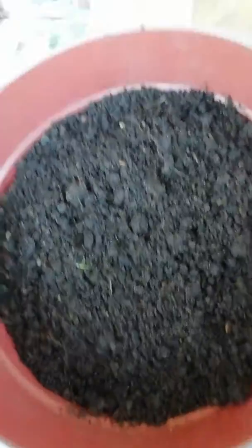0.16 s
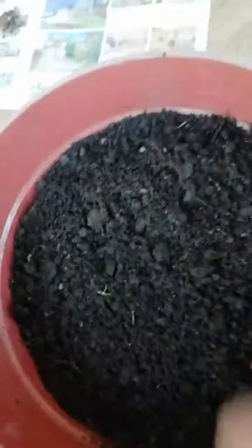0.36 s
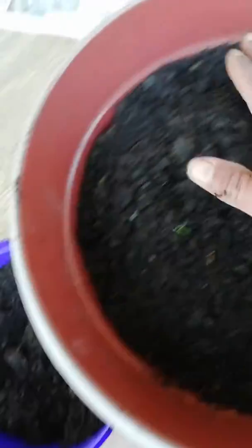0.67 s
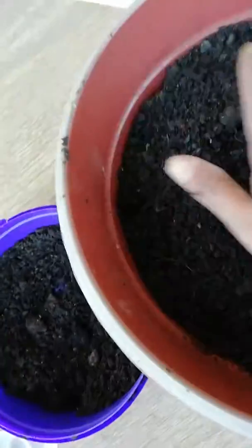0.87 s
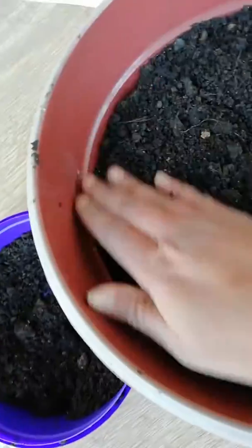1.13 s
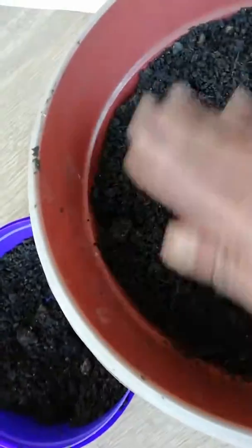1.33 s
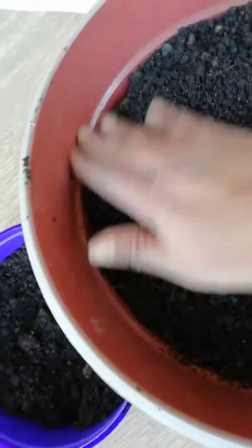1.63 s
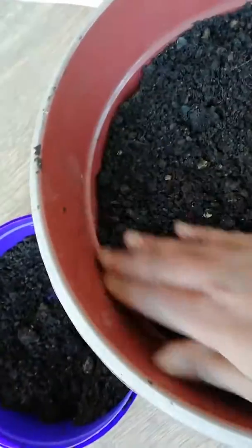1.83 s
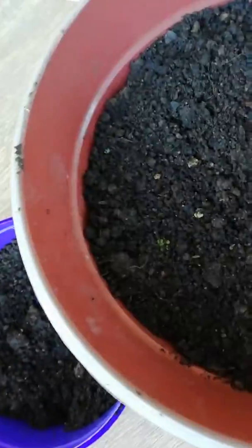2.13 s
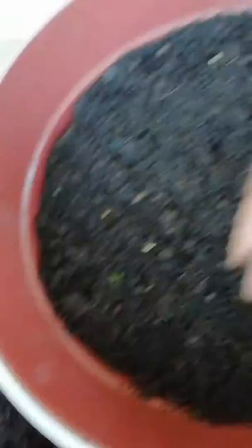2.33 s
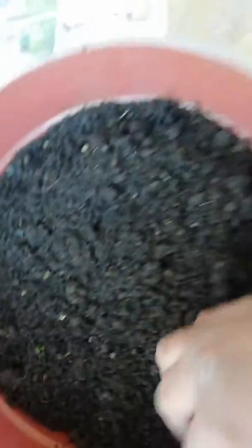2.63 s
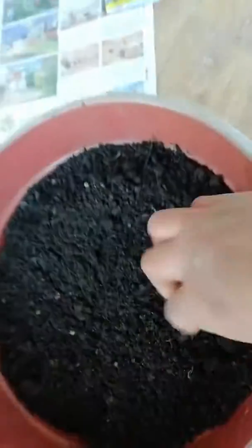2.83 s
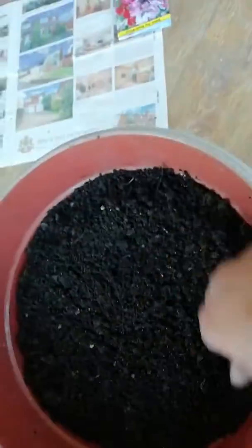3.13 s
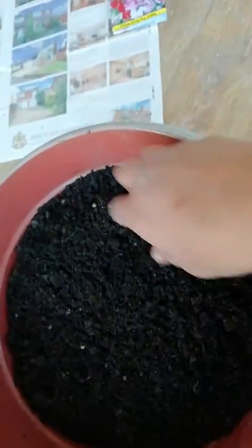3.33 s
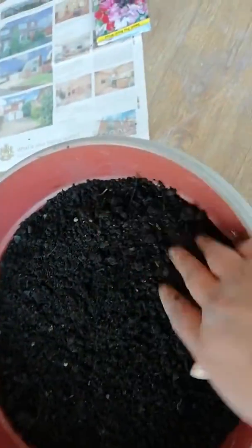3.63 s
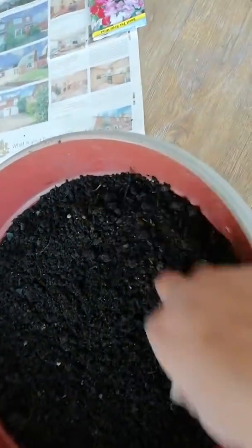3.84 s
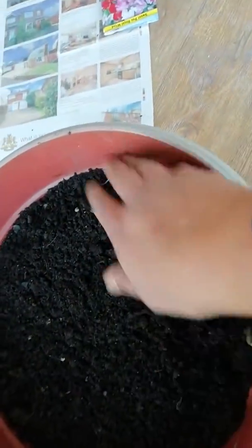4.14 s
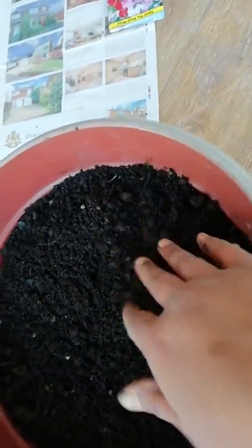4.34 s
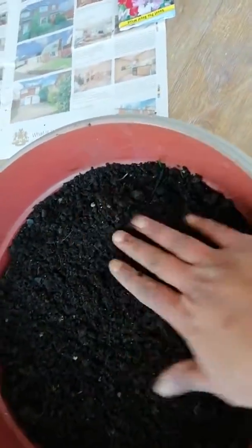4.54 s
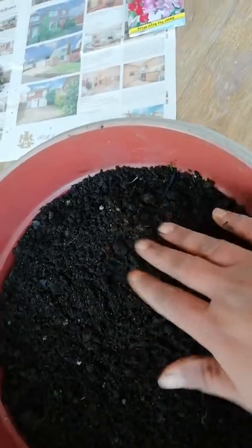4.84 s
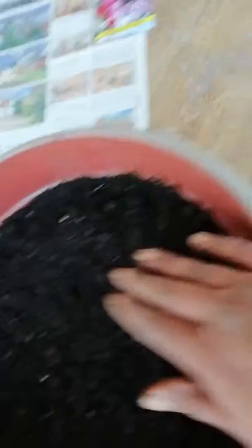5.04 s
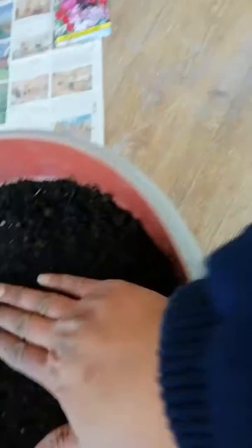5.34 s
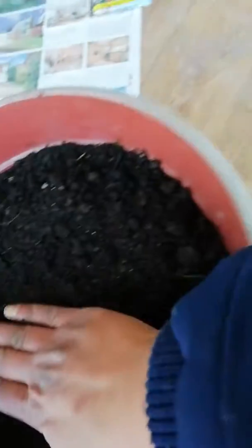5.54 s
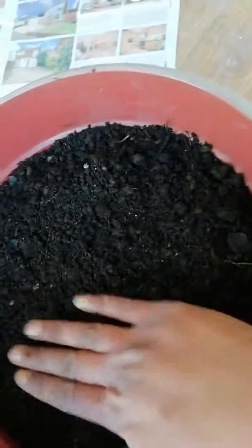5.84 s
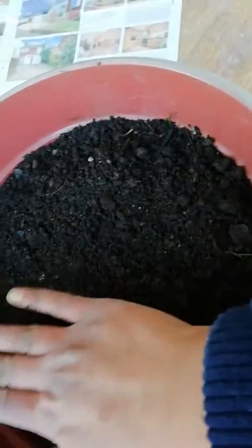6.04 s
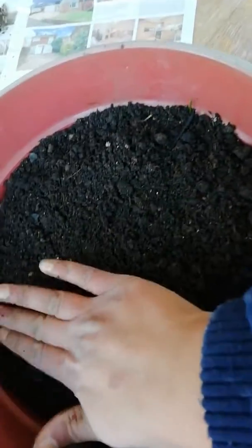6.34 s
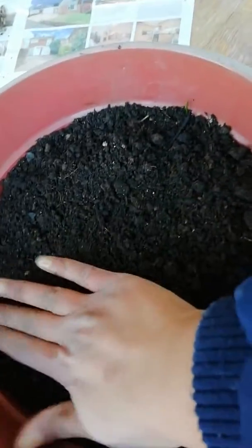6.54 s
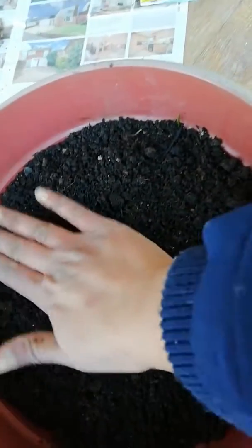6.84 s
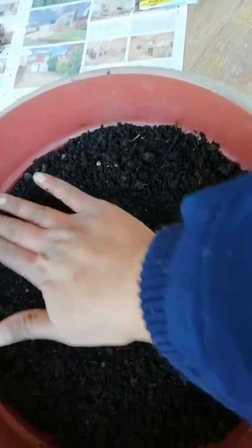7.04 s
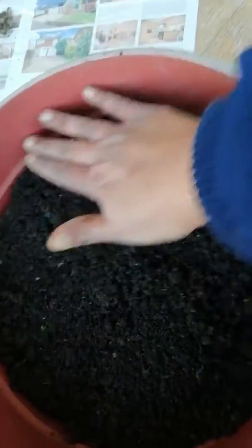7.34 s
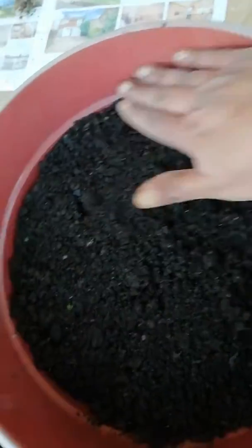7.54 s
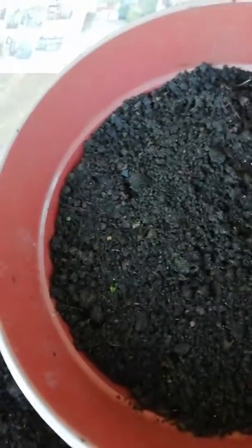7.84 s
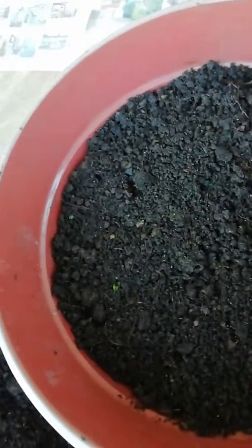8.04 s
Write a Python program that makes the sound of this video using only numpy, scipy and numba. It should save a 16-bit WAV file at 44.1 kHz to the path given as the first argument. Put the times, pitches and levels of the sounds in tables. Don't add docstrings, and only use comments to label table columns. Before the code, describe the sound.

Hands sweep and dig through loose crumbly soil in a plastic pot, with sharp knocks, gentle pats and a low engine hum outside.

```python
import sys
import numpy as np
from scipy import signal
from scipy.fft import rfft, irfft
from scipy.io import wavfile
from scipy.ndimage import uniform_filter1d
from numba import njit

SR = 44100
rng = np.random.default_rng(int(sys.argv[2]) if len(sys.argv) > 2 else 0)


def materialize(psi):
    bounded = np.clip(np.atleast_2d(psi).T, -1, 1)
    quanta = np.round(bounded * 32767).astype(np.int16)
    wavfile.write(sys.argv[1], SR, quanta)


def undo_db(level):
    steps = np.asarray(level, float) / 20
    return 10 ** steps


N = 361179
TIME = np.arange(N) / SR
ONE = np.ones(N)
SIDES = np.array([[1], [-1]])

# (time [s], resonance under the palm [Hz], left minus right [dB])
PALM = [(0.26, 1717, -14.5), (0.64, 1700, -12.5), (0.8, 2500, -13), (1.05, 1900, -10), (1.3, 2440, -9),
        (2.1, 2770, -6.5), (2.6, 2940, -13), (3.03, 1796, -10.5), (3.3, 2120, -11.5), (5.04, 1600, -12),
        (5.27, 2320, -11.5), (5.78, 1560, -10), (6.09, 2550, -6), (7.12, 2174, -14), (7.32, 1310, -7.5),
        (7.41, 2830, -5.5), (7.63, 3120, -7.5), (8.19, 1780, -14)]


def level(x, db):
    mono = np.mean(np.atleast_2d(x), axis=0)
    return x * undo_db(db) / np.sqrt(np.mean(mono ** 2))


def columns(table):
    s, *rest = np.transpose(table)
    return [np.interp(TIME, np.maximum.accumulate(s), c) for c in rest]


def during(table):
    is_open = 1. * (TIME >= table[0][0]) * (TIME <= table[-1][0])
    return uniform_filter1d(is_open, SR // 14, mode="nearest")


def walk(rate):
    k = int(SR / rate)
    held = rng.standard_normal(N // 40)[np.arange(N) // k]
    return 1.3 * uniform_filter1d(uniform_filter1d(held, k), k)


def colour(x, points):
    hz, db = np.transpose(points)
    grid_hz = np.maximum(np.fft.rfftfreq(4096, 1 / SR), 1)
    cepstrum = irfft(np.interp(np.log(grid_hz), np.log(hz), db) * np.log(10) / 20)
    cepstrum[1:2048] *= 2
    cepstrum[2049:] = 0
    return signal.fftconvolve(x, irfft(np.exp(rfft(cepstrum))))[:len(x)]


def band(x, lo_hz, hi_hz):
    return signal.sosfilt(signal.butter(3, [lo_hz, hi_hz], "band", fs=SR, output="sos"), x)


@njit
def svf(x, hz, width):
    y, b, l = np.empty(len(x)), 0., 0.
    for i in range(len(x)):
        g, k = np.tan(np.pi * hz[i] / SR), width[i] / hz[i]
        v = (b + g * (x[i] - l)) / (1 + g * (g + k))
        b, l, y[i] = 2 * v - b, l + 2 * g * v, k * v
    return y


def ports(x):
    # (frequency [Hz], gain [dB])
    left_port = [(450, -6.5), (1200, 4), (1700, -1), (2300, -3.5), (3300, 2.5), (4000, -5), (4800, -3.5),
                 (6100, -6), (7600, -20), (9200, -4), (10000, -2), (13000, 0), (15000, 7), (16200, -37)]
    right_port = [(450, -0.5), (1200, 7.5), (1700, 6), (2400, 4.5), (3300, 6.5), (4000, -1), (4900, 3.5),
                  (6300, 11), (7100, 9.5), (7900, 0), (9300, -3), (10100, -0.5), (15000, -0.5),
                  (16200, -30)]
    return np.array([colour(x[0], left_port), colour(x[1], right_port)])


def room(x):
    t60_s, tail_db = 0.55, -26
    t = np.arange(SR // 2) / SR
    tail = rng.standard_normal((2, len(t))) * undo_db(-60 * t / t60_s) * (t > .004)
    tail *= undo_db(tail_db) / np.sqrt(np.sum(tail ** 2, axis=1, keepdims=True))
    return signal.fftconvolve(x, tail, axes=1)[:, :N]


def wall(x):
    # (frequency [Hz], width [Hz], level [dB])
    pot_modes = [(1600, 50, -4), (2070, 81, -7.5), (2520, 45, 5), (2960, 48.6, -35)]
    return sum(undo_db(db) * np.array([svf(c, hz * ONE, w * ONE) for c in x]) for hz, w, db in pot_modes)


def echoes(x):
    # (delay [ms], level [dB])
    returns = [(.8, -11), (1.903, -15.5), (3.299, -9), (5.9, -8.5)]
    i, out = np.arange(N), x.copy()
    for ms, db in returns:
        late = ms * SR / 1000 * (1 + .06 * walk(2.5))
        out += undo_db(db) * np.array([np.interp(i - late * k, i, c) for k, c in zip((1, 1.04), x)])
    return out


def background():
    # (time [s], level [dB])
    street = [(0.0, -61), (0.34, -58.5), (1.46, -60.5), (2.28, -66), (2.96, -62.5), (4.1, -65),
              (5.38, -60.5), (6.38, -60), (6.8, -61), (8.19, -63.5)]
    # (time [s], level [dB])
    drone = [(0, -54), (1, -56.5), (2.5, -56), (5.4, -66), (6.7, -72.5), (8.19, -60)]
    # (frequency [Hz], density [dB per Hz])
    rumble_colour = [(12, -45.5), (20, 5.5), (49, -1), (60, 2.5), (81, -7.5), (130, -6), (252, -15.5),
                     (348, -29.5), (420, -21.5), (500, -26.5), (650, -63), (1100, -120)]
    # (frequency [Hz], density [dB per Hz])
    air_colour = [(300, -13), (600, -8), (1200, -8), (2500, -11), (4000, -16.5), (7000, -19), (15000, -20)]
    # (frequency [Hz], width [Hz])
    room_modes = [(121, 4.6), (249, 21)]
    rumble_db, air_db = -57, -68.5
    street_db, = columns(street)
    swing_db = street_db - street_db.mean()
    mode_db = columns(drone)[0], -69 + 1.7 * swing_db
    mid, side = (colour(rng.standard_normal(N), rumble_colour) for _ in range(2))
    side = signal.sosfilt(signal.butter(2, 420, "high", fs=SR, output="sos"), side)
    rumble = level(mid + undo_db(6.0) * SIDES * side, rumble_db) * undo_db(swing_db)
    modes = 0
    for (hz, width_hz), db in zip(room_modes, mode_db):
        drift_hz = hz * (1 + 0.017 * walk(1.497))
        modes = modes + level(svf(rng.standard_normal(N), drift_hz, width_hz * ONE), db - 0.5)
    air = ports([colour(band(rng.standard_normal(N), 230, 17250), air_colour) for _ in range(2)])
    return rumble + modes + level(air, air_db)


def engine():
    # (time [s], firing rate [Hz], level [dB], load as lift of the upper orders [dB])
    phases = [
        [(0.0, 38.8, -51.5, -9.5), (0.28, 41.23, -47.5, -25), (0.58, 49.07, -37.5, -14.5),
         (1.01, 50.3, -55, -7), (1.26, 51.8, -45.5, -15.5), (1.8, 49.1, -46.5, -10), (2.1, 50.6, -57.5, -12)],
        [(1.75, 40.13, -53, -9.5), (1.99, 39.02, -50, -24.5), (2.16, 30.2, -53, -16), (2.5, 29.2, -50.5, -9),
         (3.85, 26.27, -48.5, -17), (4.1, 29.03, -51.5, -21), (4.3, 26.46, -49, -13), (4.72, 25.9, -58, -29)],
        [(4.65, 31.6, -57.5, -4), (4.95, 34.08, -79.5, 13), (5.3, 35.26, -62.5, 4.5), (5.67, 35.93, -52.5, -7),
         (6.2, 37.6, -66, 10), (6.6, 38.46, -71.5, 15), (6.8, 32.4, -60, -7.5), (7.38, 30.7, -52, -4.5),
         (8.19, 27.8, -61, 2.5)],
    ]
    # (order 3 [dB], order 6 [dB])
    upper_orders = [(-9, -38), (-10.5, -1), (-22, -11.5)]
    # (frequency [Hz], width [Hz], lift [dB])
    house = [(118.4, 8.1, 19), (228.4, 4.6, 19.5)]
    orders = (1, 2, 3, 6)
    out = 0
    for phase, (third_db, sixth_db) in zip(phases, upper_orders):
        hz, db, load_db = columns(phase)
        turn = 2 * np.pi * np.cumsum(hz * (1 + 0.0058 * walk(5.5))) / SR
        for k, lift_db in zip(orders, (0, load_db, load_db + third_db, load_db + sixth_db)):
            house_db = sum(g * np.exp(-((k * hz - f) / w) ** 2) for f, w, g in house)
            strength = undo_db(db + lift_db + house_db + 3.5 + 2.35 * walk(9.2))
            out = out + during(phase) * strength * np.sin(k * turn + k)
    return out


def thumps():
    # (time [s], level [dB], rise per 60 dB [s], t60 [s])
    rocks = [
        (.33, -57, 0.65, 0.43),
        (1.621, -54, 0.027, .08),
        (3.006, -52, 0.016, 0.65),
        (7.25, -62, 0.21, 0.29),
    ]
    noise = rng.standard_normal((2, N))
    shape = 0
    for s, db, rise, t60 in rocks:
        shape = shape + undo_db(db - 60 * abs(TIME - s) / np.where(TIME < s, rise, t60))
    return level(band(noise[0] + 0.3 * noise, 135, 630), 0) * shape


def squeak():
    # (time [s], pitch [Hz], level [dB])
    slide = [(3.38, 3820, -76), (3.43, 3560, -76), (3.48, 3527, -76), (3.54, 3310, -64), (3.8, 3070, -84)]
    hz, db = columns(slide)
    tone = level(svf(rng.standard_normal(N), hz, 39.6 * ONE), 0)
    return tone * during(slide) * undo_db(db - 5.9 * SIDES)


def knocks():
    # (time [s], peak [dB], ring [Hz], sharpness [dB])
    pot_knocks = [(0.0293, -45.5, 1490, 1.5), (1.134, -45, 1530, -26), (1.1703, -36, 2520, -25),
                  (1.6194, -40, 2580, -21), (1.9463, -37, 2740, -6), (2.1617, -42.5, 1220, -18),
                  (2.1852, -38.5, 2180, -5), (2.537, -36, 1600, -15), (2.5552, -39, 3300, -4),
                  (2.766, -46.5, 1600, -12), (2.822, -47, 3190, -13), (2.8945, -51.5, 3930, -10),
                  (3.0042, -21.5, 2240, -21.5), (3.038, -38, 2120, -6.5), (3.1284, -26, 2170, -10),
                  (3.1862, -12, 3150, -9.5), (3.1958, -18.5, 2920, -21.5), (3.497, -49, 2270, -8),
                  (4.1256, -43.5, 2500, -20), (4.184, -48, 2450, -3), (5.031, -57.5, 3300, 5),
                  (6.9277, -45, 2240, -8), (7.1744, -40, 1830, -3), (7.473, -39, 2500, -21)]
    # (time [s], peak [dB])
    snaps = [(.575, -58), (1.172, -36), (5.88, -52.5), (6.035, -45), (6.185, -48), (6.48, -55), (7.18, -41)]
    blows = []
    for s, db, hz, sharp_db in pot_knocks:
        body_db = -20 - 46.5 * max(np.log2(hz / 2250), 0)
        blows.append((s, db, hz, (0, sharp_db + 5.5, sharp_db - 11, body_db)))
    blows += [(s, db, 3000, (-5, -1, 0, -40)) for s, db in snaps]
    out, t = np.zeros((2, N + 2048)), np.arange(2048) / SR
    for s, peak_db, hz, mix_db in blows:
        pan_db = -1.5 + np.interp(s, *np.transpose(PALM)[::2])
        noise = rng.standard_normal((2, len(t)))
        burst = (noise + 2.4 * noise[0]) * undo_db(-60 * t / 0.011)
        ring = np.sin(2 * np.pi * hz * t) * undo_db(-60 * t / .012) + .8 * burst
        parts = [band(ring, .5 * hz, 1.22 * hz), band(burst, 4700, 6750),
                 band(burst, 8500, 13000), band(burst, 450, 1300)]
        blow = sum(undo_db(db) * p / abs(p).max() for p, db in zip(parts, mix_db))
        out[:, int(s * SR):][:, :len(t)] += undo_db(peak_db - 1.0 + SIDES * pan_db / 2) * blow
    out = out[:, :N]
    return out + undo_db(-17) * wall(out) + undo_db(11.0) * room(out + undo_db(12) * wall(out))


def crumbs(count, spread_db, patch_ms):
    # (time [s], left later [ms])
    port_lag = [(0, 0.49), (.6, -0.44), (1.1, -1.17), (2.2, -1.31), (2.5, -0.071), (3.2, -0.3),
                (3.6, 0.0015), (4.6, 0.51), (5.8, .5), (6.4, -0.087), (7.5, -0.24), (8.19, 0.19)]
    when, size, sign, spot = rng.random((count, 4)).T
    size = undo_db(-spread_db * np.log(1 - size)) * np.sign(sign - .5)
    at = (when * N).astype(int)
    late = ((columns(port_lag)[0][at] + patch_ms * (spot - .5)) * SR / 1000).astype(int)
    return np.array([np.bincount(np.clip(i, 0, N - 1), size, N) for i in (at + late, at)])


def pressure():
    # (time of most pressure [s], rise [s], fall
    # [s], level [dB], brightness [dB])
    strokes = [(.28, .24, .17, -48.5, -5.5), (.86, 0.16, 0.23, -53.5, -2), (1.04, 0.13, 0.11, -57.5, -34),
               (1.22, 0.072, .075, -52, -1), (1.5, .11, 0.096, -57, -20),
               (1.564, 0.075, 0.021, -46.5, -10.5), (1.613, .04, 0.038, -50, -13.5),
               (1.82, 0.33, 0.28, -55, 4.5), (2.086, 0.41, 0.076, -37.5, -3.5),
               (2.169, 0.019, 0.075, -51.5, -9), (2.618, 0.085, 0.094, -44.5, 2),
               (3.16, 0.021, 0.068, -41, -15), (3.6, 0.11, 0.11, -58, 3.5), (3.71, 0.044, 0.048, -61, 3),
               (7.03, 0.14, 0.14, -55, -16), (7.145, 0.11, .1, -49.5, -8.5), (7.235, .07, 0.091, -62.5, 1.5),
               (7.32, 0.085, 0.14, -52, -8), (7.41, 0.087, 0.12, -50.5, -12), (7.51, 0.072, 0.12, -48.5, -2),
               (7.614, 0.063, 0.073, -43.5, -0.5), (7.76, .09, .12, -56.5, -5.5),
               (7.999, 0.15, .22, -56.5, -1.5),
               (3.88, 0.11, 0.13, -68, -3.5), (4.02, .07, 0.067, -73, -4.5), (4.19, 0.055, 0.058, -67.5, -15),
            (4.329, 0.085, 0.076, -74.5, -2), (4.581, 0.096, 0.052, -72, -5.5),
            (4.901, 0.075, .09, -67, -9.5), (5.265, 0.05, 0.095, -62.5, -0.5),
            (5.53, 0.14, 0.15, -64, -7.5), (6.03, 0.12, 0.15, -62.5, -7.5), (6.184, 0.065, 0.059, -57, -12),
            (6.42, 0.24, 0.19, -71.5, -13), (6.73, 0.11, 0.13, -62.5, -6.5)]
    # (time [s], level [dB], t60 [s], brightness [dB])
    spills = [(.028, -66.5, 0.77, -7), (.43, -65, 3.8, -7), (1.129, -58, 0.71, -17),
              (1.299, -70, 1.6, -21.5), (1.666, -64, .5, 11), (2.531, -51, 0.13, -4.5),
              (2.7, -52.5, 0.44, -6.5), (3.012, -54, 0.49, -9), (3.122, -36, 0.2, -11),
              (3.206, -43.5, 0.44, -22.5), (3.495, -62, 0.74, -3), (4.129, -72, 0.67, -9.5),
              (4.815, -69.5, 0.43, -6), (5.018, -67.5, 1.16, -7), (5.69, -71.5, 2.2, -13),
              (5.975, -61.5, 0.42, -11), (6.913, -65, 1, -9), (7.679, -54.5, 0.48, -2.5),
              (8.187, -64.5, 0.57, 0)]
    t = TIME[::32]
    parts = [(-111.5 + 0 * t, 12.5)]
    for s, rise, fall, db, bright_db in strokes:
        drop_db = 21.5 * (abs(t - s) / np.where(t < s, rise, fall)) ** 2.14
        parts.append((db - drop_db, bright_db - 0.22 * drop_db))
    for s, db, t60, bright_db in spills:
        fade_db = 60 * abs(t - s) / np.where(t < s, .025, t60)
        dust_settles = 0.97
        parts.append((db - fade_db, bright_db - (dust_settles - 1) * fade_db))

    def total(lift_db, bright_share):
        power = sum(undo_db(db + lift_db + bright_share * bright_db) ** 2 for db, bright_db in parts)
        return np.interp(TIME, t, 10 * np.log10(power))

    return total(0, 0), total(3.5, 0.36), total(0, 1)


def hand():
    band_edges = [450, 1700, 4000, 8500, 16500]
    crunch_db, grit_db, dust_db = pressure()
    palm_hz, pan_db = columns(PALM)
    ticks = crumbs(count=220000, spread_db=2.0, patch_ms=0.24)
    ring = np.array([svf(c, palm_hz, 0.57 * palm_hz) for c in ticks])
    ticks = ports(echoes(ticks + undo_db(7) * ring + wall(ticks)))
    ticks += room(ticks)
    slips_db = 0.64 * walk(35) + 0.72 * walk(130)
    palm_oct = np.log2(palm_hz / 2000)
    hollow_db = -7 - 11 * palm_oct - 55 + 0.82 * (crunch_db + 55)
    band_db = (hollow_db, crunch_db, grit_db - 4.5 * palm_oct, dust_db)
    out = 0
    for lo, hi, db in zip(band_edges, band_edges[1:], band_db):
        edges = np.geomspace(lo, hi, 4)
        clumps = 0
        for a, b in zip(edges, edges[1:]):
            clumps = clumps + band(ticks, a, b) * undo_db(1.25 * walk(18) + 1.56 * walk(70))
        out = out + level(clumps, 0) * undo_db(db)
    return out * undo_db(slips_db + SIDES * (pan_db + 10.5) / 2)


def scene():
    return hand() + knocks() + squeak() + thumps() + engine() + background()


def top_cut(x):
    return signal.sosfilt(signal.butter(12, 16620, fs=SR, output="sos"), x)


def record(dry):
    cut = signal.sosfilt(signal.ellip(10, .2, 70, 15720, fs=SR, output="sos"), dry)
    return top_cut(cut)


dry = scene()
out = record(dry)
materialize(out)
```